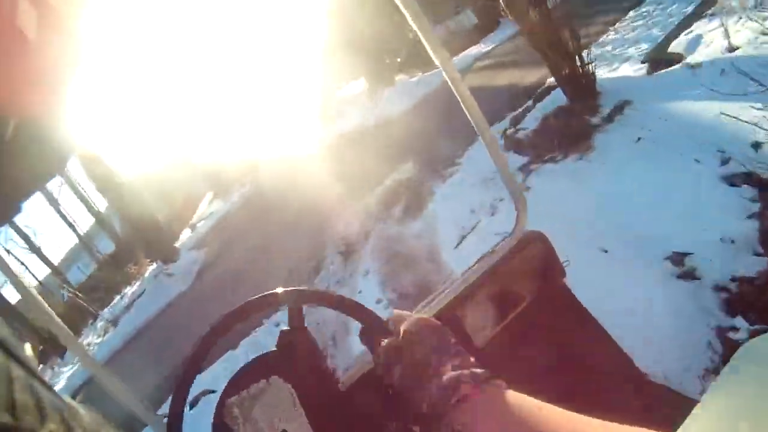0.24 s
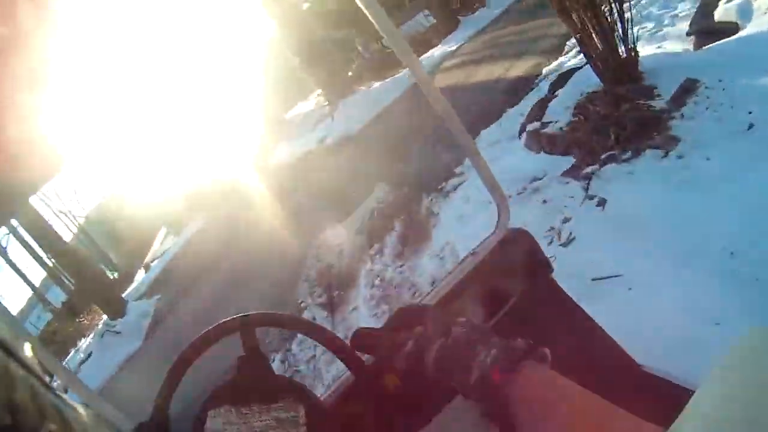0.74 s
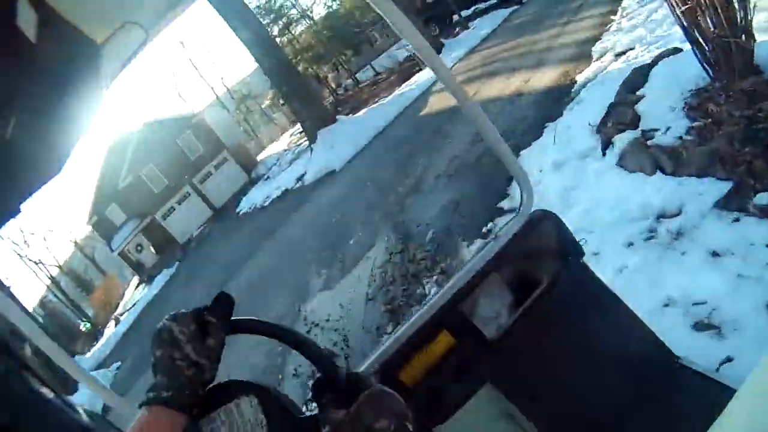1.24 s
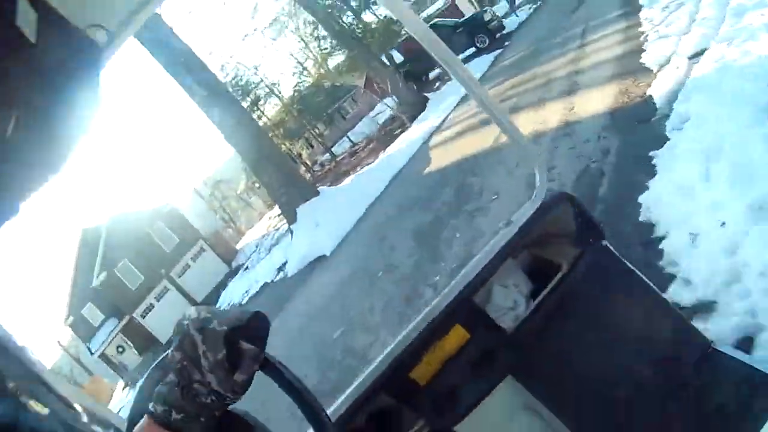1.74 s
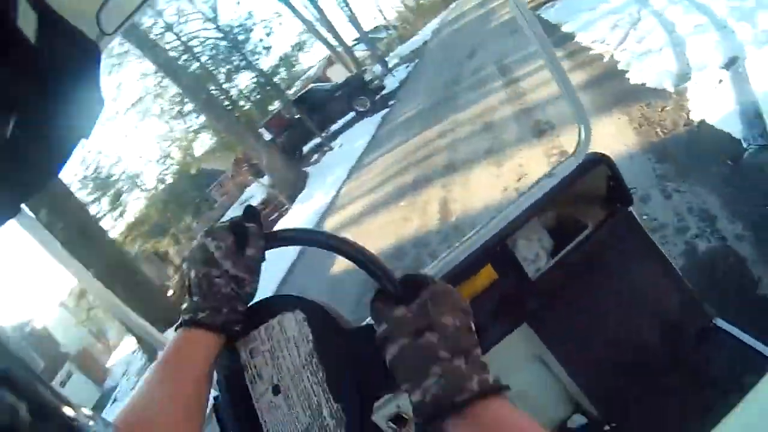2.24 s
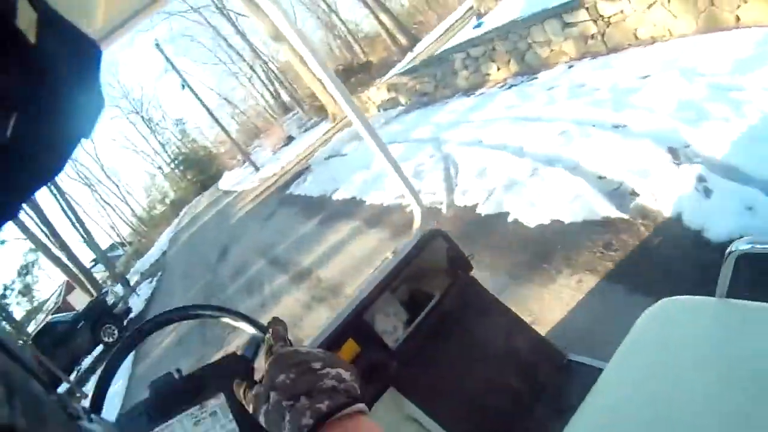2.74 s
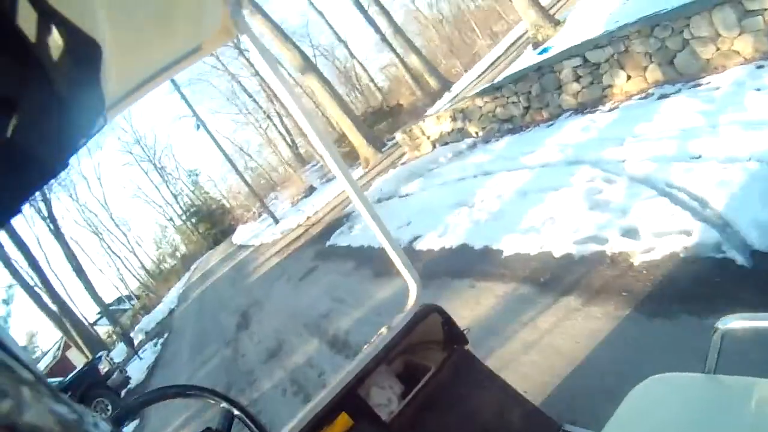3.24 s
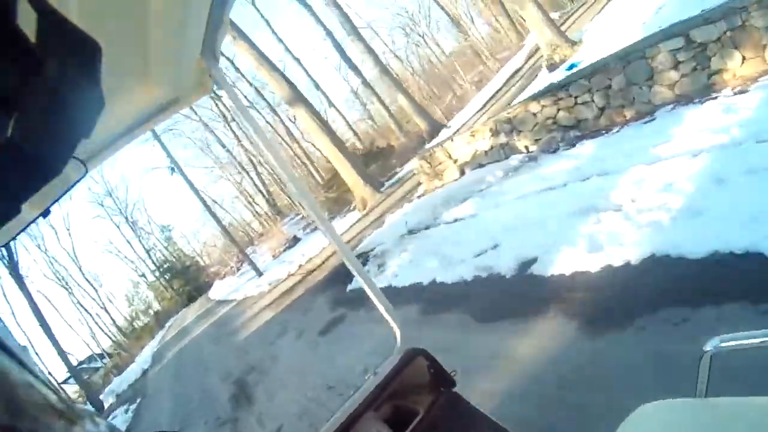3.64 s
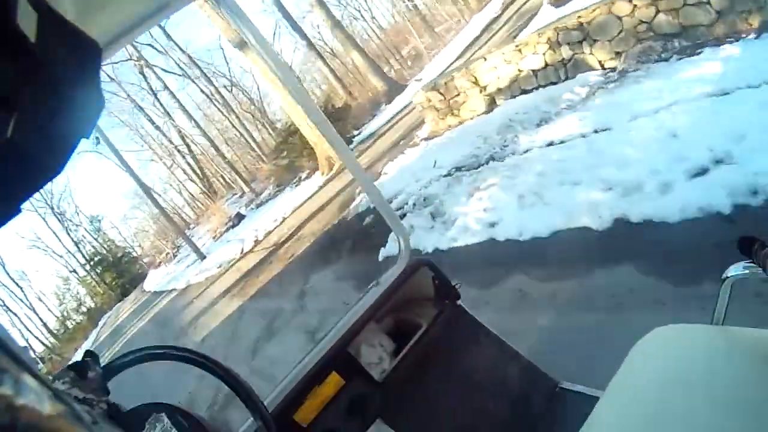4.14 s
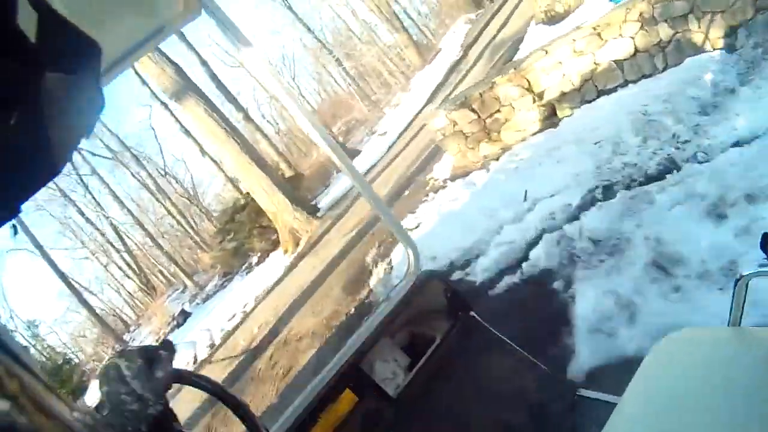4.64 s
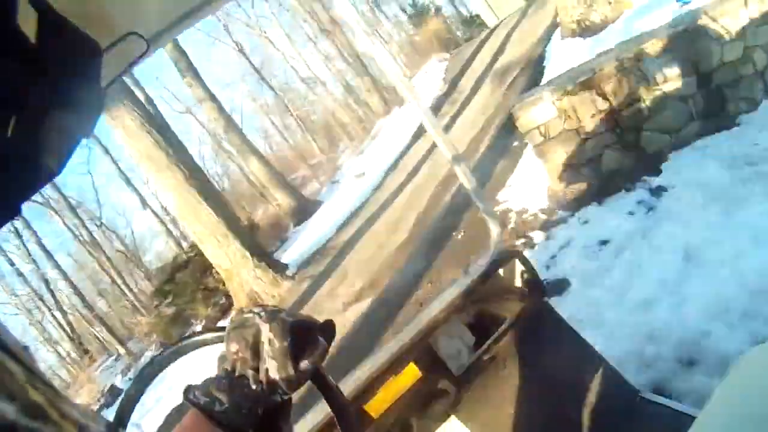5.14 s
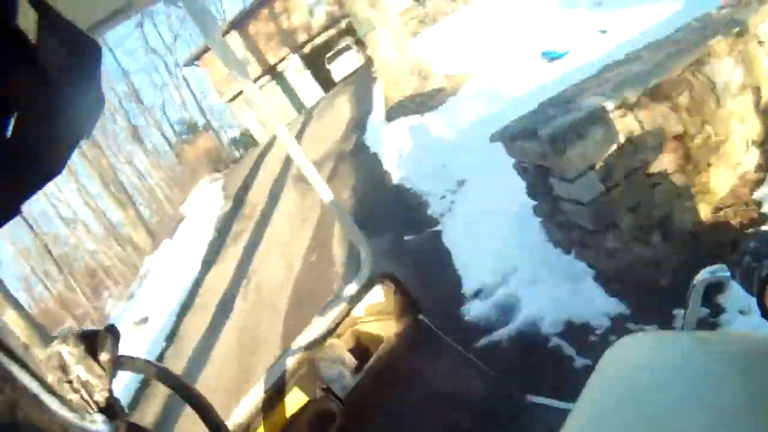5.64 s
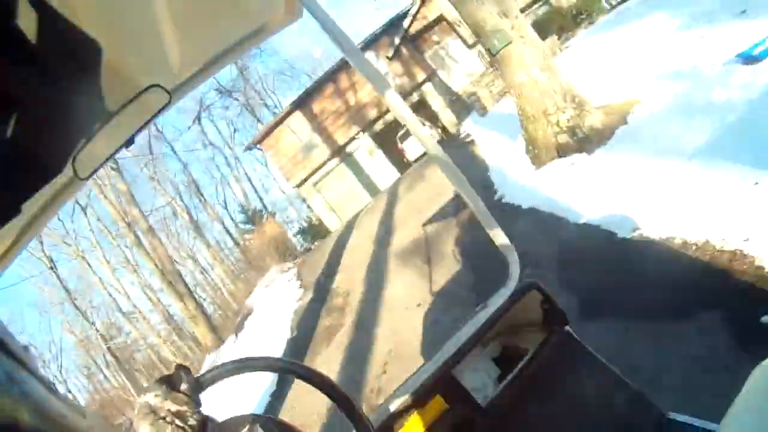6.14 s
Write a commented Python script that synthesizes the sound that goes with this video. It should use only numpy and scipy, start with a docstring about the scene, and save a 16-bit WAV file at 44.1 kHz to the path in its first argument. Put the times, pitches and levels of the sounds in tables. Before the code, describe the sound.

A golf cart's one-cylinder engine putters, speeds up and drives on with panel knocks, tyre hiss and growing wind rumble.

```python
"""Golf cart pulling away

A one-cylinder four-stroke idles, takes throttle and pulls the cart along a paved drive. Exhaust and
intake thump in turn, drive train and tyres hiss, the belt rings, loose panels knock and grit rattles.
As it gathers speed, wind buffets the rider's small enclosed microphone and overloads it."""
import sys
import numpy as np
from scipy import signal
from scipy.fft import rfft, irfft
from scipy.io import wavfile

SR = 44100
rng = np.random.default_rng(int(sys.argv[2]) if len(sys.argv) > 2 else 0)


def file_out(sig):
    """Save sig as 16-bit WAV at sys.argv[1]."""
    # one column per channel
    cols = np.atleast_2d(sig).T
    # limit, then scale
    lim = np.clip(cols, -1, 1)
    pcm = np.round(lim * 32767).astype(np.int16)
    wavfile.write(sys.argv[1], SR, pcm)


N = 281799
TIME = np.arange(N) / SR

# Engine speed. Each row: time in seconds, firings per second.
ENGINE_SPEED = [(0.0, 14.12), (0.42, 14.16), (0.78, 16.46), (0.94, 16.47), (1.1, 19.78), (1.55, 24.77),
                (2.06, 19.63), (2.38, 22.05), (2.76, 20.92), (3.38, 23.72), (4.1, 19.57), (5.07, 23.28),
                (5.35, 18.96), (5.68, 21.93), (6.39, 22.94)]
# Throttle, as the weight of the intake gulp. Each row: time in seconds, level in dB.
THROTTLE = [(0, -58), (.56, -47), (.62, -21.5), (.97, -22.5), (1.04, -16), (1.6, -15), (1.78, -27.5),
            (2.03, -25.5), (2.14, -15.5), (3.5, -16), (3.85, -27), (4.5, -14.5), (5.2, -16.5), (5.3, -24),
            (5.4, -14.5), (6.39, -11.5)]
# The engine rocking on its mounts. Each row: multiple of the firing rate, relative level in dB.
ROCKING_HARMONICS = [(1, -5), (2, -1), (3, -.5), (4, -14), (5, -7)]
# Running noise of drive train and tyres. Each row: time in seconds, relative level in dB.
RUNNING_LEVEL = [(0, -39.5), (.75, -43.5), (1.4, -36), (1.9, -35.5), (2.25, -33.5), (2.8, -38.5),
                 (3.3, -35), (4.05, -42), (4.62, -33.5), (4.95, -38.5), (5.7, -34), (6.39, -35.5)]
# Its colour at idle and under way. Each row: frequency in Hz, relative level in dB.
IDLE_COLOUR = [(30, 5), (80, 15), (200, 7.5), (280, -13), (450, 6), (600, -3), (800, -8.5), (1600, -13),
               (2150, -4.5), (2800, -11.5), (3500, -22.5), (4200, -29.5), (4700, -31), (8000, -47.5)]
DRIVE_COLOUR = [(200, 10), (310, 7.5), (390, 3.5), (570, 0.5), (740, 2), (880, -5.5), (1150, -6),
                (1700, -9.5), (2250, -0.5), (2500, -6.5), (2830, -10.5), (3500, -23), (4200, -31),
                (4750, -30), (6500, -43.5), (13000, -57)]
# Ring of the bodywork and microphone housing. Each row: pitch in Hz, width in Hz, gain in dB.
BODY_MODES = [(346, 120, 6), (732, 93, 8.5), (1035, 550, 1), (1985, 286, 0), (2237, 136, 6.5),
              (2792, 523, -2), (4500, 790, -21.5)]
# Knocks of loose panels and pedal, and thin rattles of tyres on grit.
# Each row: start in seconds, peak in dB, low-end gain in dB, decay in seconds.
KNOCKS_AND_GRIT = [(.109, -26, -16, .0044), (.143, -30, -18, .012), (.316, -25.5, 14, .008),
                   (1.023, -18.5, -1, .004), (1.033, -19, 0, .0044), (1.157, -23.5, -12, .007),
                   (1.3, -26, -8, .008), (1.663, -16.5, 6, .006), (1.688, -19, 3, .009),
                   (1.925, -17.5, -2, .007), (1.954, -15.5, 12, .012), (1.972, -21, 10, .025),
                   (2.052, -22, -10, .007), (2.103, -17.5, -1, .007), (2.114, -18, 6, .008),
                   (2.225, -19, 14, .004), (2.313, -26, -6, .005), (4.78, -23, -20, .012),
                   (5.045, -21.5, -20, .016), (5.245, -21.5, -20, .014), (5.352, -13, 1, .0035),
                   (5.361, -15, 5, .005), (6.16, -21, -3, .005), (6.343, -19, 5, .005)]
# Ring of the clutch pulleys. Each row: pitch in Hz, width in Hz, relative level in dB.
PULLEY_MODES = [(2210, 45, -4), (2335, 59, -4), (2830, 150, -7)]
# Rasp of the belt's edges. Each row: time in seconds, relative level in dB.
RASP_LEVEL = [(1.0, -81), (1.3, -62), (1.58, -63.5), (1.8, -68), (2.25, -63.5), (2.85, -75.5), (3.2, -65.5),
              (3.45, -66), (3.8, -77), (5.3, -76.5), (5.8, -67.5), (6.39, -69)]
# Where the rasp rings. Each row: pitch in Hz, width in Hz, relative level in dB.
RASP_MODES = [(3880, 300, -4.5), (4780, 710, -3), (6420, 1300, -14), (9500, 1000, -18)]
# Airflow over the microphone. Each row: time in seconds, relative level in dB.
AIRFLOW = [(1.0, -68), (1.7, -42.5), (2.1, -40), (2.6, -24), (2.95, -31), (3.25, -27.5), (3.45, -19),
           (3.8, -23), (4.25, -23.5), (4.75, -21), (5.05, -18), (5.27, -24.5), (5.33, -30), (5.8, -26.5),
           (6.39, -21)]
# Colour of the slow eddies and the fast ones. Each row: frequency in Hz, relative level in dB.
BUFFET_COLOUR = [(15, 13), (30, -1), (55, 12), (85, 12), (130, 2), (200, -6), (400, -44.5), (1000, -82.5)]
RUSH_COLOUR = [(40, -31.5), (100, 0), (170, 3), (260, -2), (400, -6), (600, -10.5), (900, -17.5),
               (1400, -29.5), (2400, -32), (4000, -72.5), (9000, -91.5)]
# Gusts on top of the flow. Each row: crest time in seconds, length in seconds, buffet in dB, rush in dB.
GUSTS = [(1.776, 0.023, -23, -46), (2.287, 0.049, -44, -19), (2.573, 0.19, -28, -22),
         (2.78, 0.094, -21.5, -20.5), (3.065, 0.1, -23.5, -20), (3.526, 0.042, -13.5, -19),
         (3.586, 0.079, -29, -22), (3.797, 0.11, -23, -25.5), (3.942, 0.067, -21, -24.5),
         (4.032, 0.078, -14, -24), (4.197, 0.034, -36, -18.5), (4.46, 0.063, -27.5, -18),
         (4.607, 0.068, -13.5, -27), (4.848, 0.13, -19.5, -26), (4.92, 0.027, -21, -19),
         (4.995, 0.054, -22, -16.5), (5.088, 0.03, -17, -14.5), (5.162, 0.036, -27, -21),
         (5.238, 0.062, -15.5, -28), (5.405, 0.029, -22, -45), (5.624, 0.07, -19, -32),
         (6.133, 0.12, -15.5, -26)]
# Slaps of air. Each row: time in seconds, peak in dB, diaphragm tick in dB before filtering.
AIR_SLAPS = [(2.776, -7, -28), (3.082, -18, -31), (3.466, -6, -31), (3.522, -12.5, -25), (3.562, -9.5, -33),
             (3.663, -8, -46), (3.912, -7, -36), (3.938, -7, -27), (3.971, -6.5, -30), (4.059, -9, -23),
             (4.179, -15, -47), (4.394, -14, -50), (4.431, -11, -28), (4.457, -9, -21), (4.586, -15, -49),
             (4.602, 0, -23), (4.833, -11.5, -51), (4.889, -6.5, -34), (4.914, -7.5, -30),
             (4.948, -16, -24), (5.007, -15, -27), (5.066, -14, -23), (5.086, -3, -26), (5.133, -18, -35),
             (5.153, -5.5, -25), (5.217, -14, -26), (6.084, -20, -26), (6.114, -16, -26),
             (6.151, -6.5, -25), (6.302, -12, -21), (6.346, -22, -23), (6.355, -5.5, -27)]
# Ring of the frame and roof struts. Each row: pitch in Hz, width in Hz, relative level in dB.
FRAME_MODES = [(749, 55, -3.5), (923, 29, -3), (1186, 95, -5), (1878, 88, -9.5), (2077, 51, -3.5)]
# A pulley face singing on and off. Each row: time in seconds, pitch in Hz, level in dB.
PULLEY_SONG = [(.15, 2870, -55), (.45, 2770, -74), (1.15, 2807, -48.5), (1.6, 2775, -49),
               (1.95, 2792, -55.5), (2.55, 2797, -47.5), (3.1, 2757, -58), (3.45, 2756, -53),
               (3.9, 2760, -61), (5.35, 2715, -61), (5.56, 2690, -46), (5.9, 2815, -53), (6.39, 2800, -57)]
# A faint, sinking whistle. Each row: time in seconds, pitch in Hz, level in dB.
WHISTLE = [(3.5, 1980, -74), (3.72, 1940, -46), (3.92, 1817, -46), (4.3, 1850, -58), (4.9, 1890, -54),
           (5.28, 1620, -46), (5.5, 1680, -69)]

BITE_S, SLIP_S, LOCK_S = 1.02, 0.55, 0.22   # when the clutch bites; how long it slips, then takes to lock


def engine(cycle, firing_hz, judder_db=7.5):
    """Exhaust puffs, intake gulps a third of a cycle later; under load the block rocks and panels buzz."""
    throttle_db, = in_time(THROTTLE)
    exhaust = puffs(cycle, firing_hz, pipe_hz=149.8, open_s=0.0033, uneven_db=2.0)
    exhaust *= from_db(-14.5 + 0.23 * throttle_db)
    intake = puffs(cycle - .33, firing_hz, pipe_hz=124.5, open_s=0.0053, uneven_db=1.5)
    intake *= from_db(throttle_db)
    load = from_db(-24 + throttle_db + judder_db * clutch_slip())
    rocking = sum(from_db(db) * np.sin(2 * np.pi * k * cycle) * from_db(2.3 * drift(2.7))
                  for k, db in ROCKING_HARMONICS)
    buzz = focus(rng.standard_normal(N), hz=387, width=67)
    buzz *= from_db(-3.5 + 0.65 * np.cos(2 * np.pi * (cycle - .4)))
    floor_pan = from_db(-53.5) * focus(rng.standard_normal(N), hz=99, width=35)
    return exhaust + intake + load * (rocking + buzz) + floor_pan


def puffs(cycle, firing_hz, pipe_hz, open_s, uneven_db):
    """A valve opens and shuts smoothly once a cycle, and the pipe behind it sounds for that moment."""
    number = np.round(cycle).astype(int)
    age = (cycle - number) / firing_hz
    strength = from_db(uneven_db * rng.standard_normal(200))[number]
    return strength * np.exp(-.5 * (age / open_s) ** 2) * np.cos(2 * np.pi * pipe_hz * age)


def casing_rattle(cycle, bark_cycles=0.11, gulp_cycles=.12):
    """Casing and panels rattle with each puff and gulp; the airbox growls while the clutch slips."""
    throttle_db, = in_time(THROTTLE)
    from_puff = (cycle + .5) % 1 - .5
    bark = from_db(-42) * np.exp(-.5 * (from_puff / bark_cycles) ** 2)
    gulp = from_db(throttle_db) * np.exp(-.5 * ((cycle % 1 - 0.49) / gulp_cycles) ** 2)
    panels = rms_one(butter(body(rng.standard_normal(N)), 2900, "low"))
    airbox = rms_one(butter(rng.standard_normal(N), [410, 790], "band"))
    rattle = (bark + gulp * from_db(-21 + 3.5 * clutch_slip())) * panels
    growl = gulp * clutch_slip() * from_db(-22.5) * airbox
    return rattle + growl


def clutch_slip():
    """Jumps to 1 as the clutch bites and slips, then fades to 0 as it locks."""
    return (TIME > BITE_S) * np.clip(1 - (TIME - BITE_S - SLIP_S) / LOCK_S, 0, 1)


def drive_train(cycle):
    """Belt and tyres hiss over the clatter, throbbing with each firing, filling out as the clutch bites."""
    level_db, = in_time(RUNNING_LEVEL)
    engaged = np.clip(.5 + (TIME - BITE_S) / 0.1, 0, 1)
    throb_db = 1.0 - 1.5 * clutch_slip()   # shallower and flipped during the slip
    throb = from_db(throb_db * np.cos(2 * np.pi * (cycle - .45)) + drift(18))
    idle = (1 - engaged) * from_db(2.5) * noise(IDLE_COLOUR)
    rolling = engaged * from_db(5.5) * noise(DRIVE_COLOUR)
    return from_db(level_db) * throb * (idle + rolling + from_db(-10.5) * clatter(cycle))


def clatter(cycle, contacts=24, jitter_s=.00008):
    """Valve gear and clutch make the same contacts in every cycle, never quite equally hard."""
    hits, turns = np.zeros(N), np.arange(np.ceil(cycle[-1]))
    for place, size in zip(rng.random(contacts), rng.standard_normal(contacts)):
        when = np.interp(turns + place, cycle, TIME, left=-1, right=-1)
        when += jitter_s * rng.standard_normal(len(turns))
        at = (when[(when > 0) & (when < TIME[-1])] * SR).astype(int)
        hits[at] += size * from_db(1.3 * rng.standard_normal(len(at)))
    return rms_one(butter(body(hits), 4800, "low", order=3))


def knocks_and_grit(low_hz=900):
    """Panels and pedal knock, tyres rattle on grit: short chatters of contacts, heavy ones with more bass."""
    out, age = np.zeros(N), TIME[:SR // 10]
    for s, peak_db, low_db, decay_s in KNOCKS_AND_GRIT:
        hit = body(rng.standard_normal(len(age)) * np.exp(-age / decay_s))
        hit += (from_db(low_db) - 1) * butter(hit, low_hz, "low", order=1)
        hit = butter(hit, 4400, "low")
        start = round(s * SR)
        out[start:start + len(age)] += (from_db(peak_db) * hit / np.abs(hit).max())[:N - start]
    return out


def body(x):
    """The panels' resonances ring side by side, in alternating polarity."""
    return sum((-1) ** k * from_db(db) * resonate(x, hz, width)
               for k, (hz, width, db) in enumerate(BODY_MODES))


def belt(cycle, firing_hz, wander=0.013):
    """The belt rubs the pulleys into ringing, louder the faster they spin; its edges rasp in swells."""
    bend = 1 + wander * drift(7)   # the pitch bends as the belt rides up and down
    ringing = sum(from_db(db + 3.2 * drift(23)) * noisy_ring(hz * bend, width)
                  for hz, width, db in PULLEY_MODES)
    ringing *= from_db(-45.5 + 2.2 * (firing_hz - 25.0))
    rasp_db, = in_time(RASP_LEVEL)
    swell = from_db(rasp_db + 3.2 * drift(60))
    rasp = swell * sum(from_db(db) * noisy_ring(hz, width) for hz, width, db in RASP_MODES)
    throb = from_db(1.6 * np.cos(2 * np.pi * (cycle - .4)))
    return throb * (ringing + rasp)


def gears(firing_hz, teeth_per_firing=33.8, cruise_hz=22, waver=0.0293, rough_db=10.5):
    """A rough mesh tone follows the engine's speed and sings out at the axle housing's resonance."""
    mesh = sine(teeth_per_firing * firing_hz * (1 + waver * drift(38)))
    roughness = from_db(rough_db * np.tanh(drift(49)))
    housing = resonate(mesh * roughness, hz=734, width=69)
    return from_db(-45.5 + 1.5 * (firing_hz - cruise_hz)) * rms_one(housing)


def cogs(cycle, cogs_per_firing=7.3, overtones=34, slip=.012):
    """Belt cogs buzz once the clutch bites; their overtones glide through the pulley's resonance."""
    strikes = cogs_per_firing * cycle + slip * drift(25)
    buzz = sum(np.cos(2 * np.pi * (k * strikes + start))
               for k, start in enumerate(rng.random(overtones), 1))
    ringing = focus(buzz, hz=2290, width=450)
    return (TIME > BITE_S) * from_db(-46 + db_from_peak(RUNNING_LEVEL)) * ringing


def wind():
    """Large eddies shove the microphone, small ones tear past in quick lumps; gusts swell and die."""
    flow_db, = in_time(AIRFLOW)
    slow_power, fast_power = from_db(flow_db - 4) ** 2, from_db(flow_db - 0.5) ** 2
    for s, length, buffet_db, rush_db in GUSTS:
        bell = np.exp(-(2 * (TIME - s) / length) ** 2)
        slow_power += bell * from_db(buffet_db) ** 2
        fast_power += bell * from_db(rush_db) ** 2
    lumps = drift(40)
    buffet = rms_one(noise(BUFFET_COLOUR) * from_db(3.7 * lumps))
    rush = rms_one(noise(RUSH_COLOUR) * from_db(4.74 * np.tanh(.5 * lumps + 0.94 * drift(55))))
    return np.sqrt(slow_power) * buffet + np.sqrt(fast_power) * rush


def air_slaps(push_to_pull_s=.0012, most_small_per_s=26):
    """An eddy bursting on the port pushes, then pulls; small ones come thicker and harder with the flow."""
    flow = from_db(db_from_peak(AIRFLOW))
    born = rng.random(N) < most_small_per_s * flow ** 2 / SR
    bursts = born * np.sqrt(flow) * from_db(-18.5) * rng.choice([-1, 1], N)
    for s, peak_db, _ in AIR_SLAPS:
        bursts[round(s * SR)] -= from_db(peak_db)
    lag = np.arange(-(SR // 100), SR // 100 + 1) / SR / push_to_pull_s
    push_pull = 2 * lag * np.exp(.5 - 2 * lag * lag)
    return signal.fftconvolve(bursts, push_pull, "same")


def diaphragm_ticks(rebound_s=0.0033, rebound_db=-5, most_crackles_per_s=70):
    """A slapped diaphragm ticks on meeting its stop, softer on leaving; strong airflow adds crackle."""
    born = rng.random(N) < most_crackles_per_s * from_db(db_from_peak(AIRFLOW)) ** 4 / SR
    ticks = born * from_db(-36) * rng.uniform(-1, 1, N)
    for (s, _, tick_db), spread in zip(AIR_SLAPS, rng.uniform(0.8, 1.4, len(AIR_SLAPS))):
        ticks[round(s * SR)] += from_db(tick_db)
        ticks[round((s + rebound_s * spread) * SR)] -= from_db(tick_db + rebound_db)
    return butter(butter(ticks, [2000, 5500], "band", order=1), 11000, "low", order=1)


def frame():
    """The struts ring with the running noise, each swelling and fading on its own."""
    rings = sum(from_db(db + 3.5 * drift(3)) * noisy_ring(hz, width) for hz, width, db in FRAME_MODES)
    return from_db(-46.5 + 0.95 * db_from_peak(RUNNING_LEVEL)) * rings


def thin_tone(rows, waver=0.0046, flutter_db=2.0):
    """A wavering, fluttering tone rides a curve of pitch and level."""
    hz, db = in_time(rows)
    return from_db(db + flutter_db * drift(11)) * sine(hz * (1 + waver * drift(25)))


def from_db(db):
    """Decibels to gain."""
    return 10 ** (np.asarray(db) / 20)


def rms_one(x):
    """Scale to unit rms."""
    return x / np.sqrt(np.mean(x ** 2) + 1e-20)


def in_time(rows):
    """Each column of a curve at every sample."""
    s, *columns = np.transpose(rows)
    return [np.interp(TIME, s, c) for c in columns]


def db_from_peak(rows):
    """A level curve with its loudest point at 0 dB."""
    db, = in_time(rows)
    return db - db.max()


def sine(hz):
    """A sine with a gliding pitch."""
    return np.sin(2 * np.pi * np.cumsum(hz) / SR)


def noise(colour):
    """Unit-rms noise in the given colour."""
    hz, db = np.transpose(colour)
    bins = np.maximum(np.arange(N // 2 + 1) * SR / N, 1)
    gain = from_db(np.interp(np.log(bins), np.log(hz), db))
    return rms_one(irfft(rfft(rng.standard_normal(N)) * gain, N))


def drift(rate):
    """A smooth random wobble of unit rms that moves about rate times a second."""
    bins = np.arange(N // 2 + 1) * SR / N
    return rms_one(irfft(rfft(rng.standard_normal(N)) / (1 + (bins / rate) ** 2), N))


def noisy_ring(hz, width):
    """A noise-driven ring of unit rms whose pitch may move."""
    phase = 2 * np.pi * np.cumsum(np.broadcast_to(hz, N)) / SR
    return rms_one(drift(width / 2) * np.cos(phase) + drift(width / 2) * np.sin(phase))


def butter(x, hz, kind, order=2):
    """Causal Butterworth filter."""
    return signal.sosfilt(signal.butter(order, hz, kind, fs=SR, output="sos"), x + 1e-18)


def resonate(x, hz, width):
    """One resonance with gain 1 at its top."""
    r = np.exp(-np.pi * width / SR)
    feedback = [1, -2 * r * np.cos(2 * np.pi * hz / SR), r * r]
    return signal.lfilter(np.array([1, 0, -1]) * (1 - r * r) / 2, feedback, x + 1e-18)


def focus(x, hz, width):
    """The same resonance twice over for steeper skirts, at unit rms."""
    return rms_one(resonate(resonate(x, hz, width), hz, width))


def scene():
    """The engine's cycle sets the cart's pulse, and the wind plays over it, in mono."""
    firing_hz, = in_time(ENGINE_SPEED)
    cycle = .23 + np.cumsum(firing_hz) / SR   # an exhaust puff at every whole number
    cart = engine(cycle, firing_hz) + drive_train(cycle) + belt(cycle, firing_hz) + gears(firing_hz)
    cart += knocks_and_grit() + casing_rattle(cycle) + cogs(cycle)
    cart += frame() + thin_tone(PULLEY_SONG) + thin_tone(WHISTLE)
    return (cart + wind() + air_slaps())[None]


def record(dry, overload=.36, knee=24, cutoff_hz=15800):
    """Peaks squash and crackle at the overload level; the electronics add hiss and a pulsing whistle."""
    clipped = dry / (1 + np.abs(dry / overload) ** knee) ** (1 / knee)
    clip_edges = np.abs(np.diff(1.0 * (np.abs(dry) > overload), prepend=0))
    crackle = from_db(-48) * butter(clip_edges * np.sign(dry), 5900, "high")
    pulse = 1 + .8 * np.cos(2 * np.pi * 58 * TIME)
    whistle = from_db(-79) * np.sin(2 * np.pi * 15174 * TIME) * pulse
    ticks = diaphragm_ticks()
    hiss = from_db(-74.0) * rng.standard_normal(N)
    top_cut = signal.ellip(10, .1, 90, cutoff_hz, fs=SR, output="sos")
    return signal.sosfilt(top_cut, clipped + crackle + ticks + hiss + whistle)


dry = scene()
out = record(dry)
file_out(out)
```